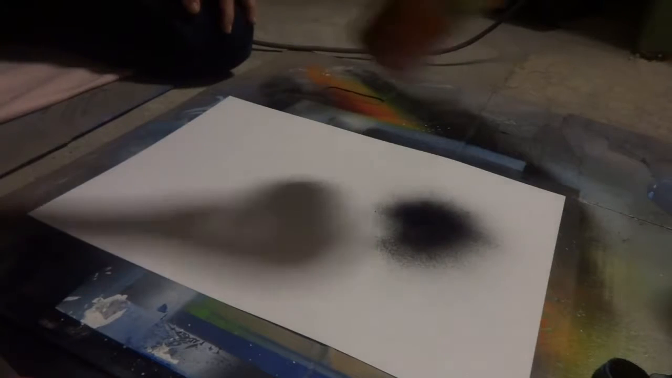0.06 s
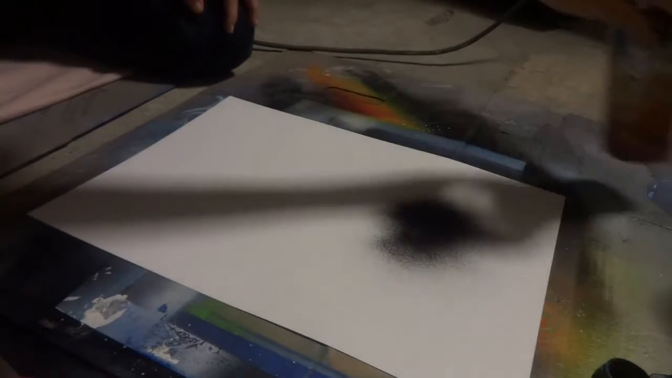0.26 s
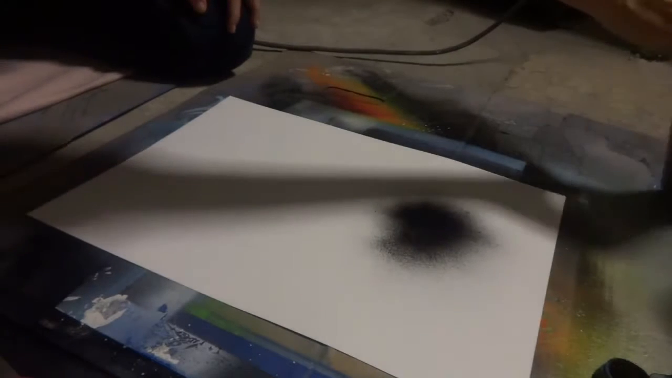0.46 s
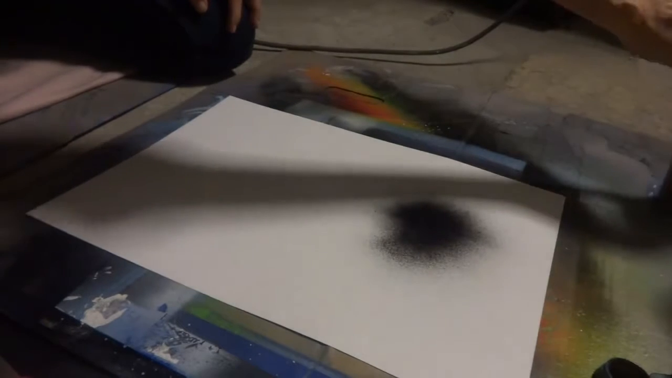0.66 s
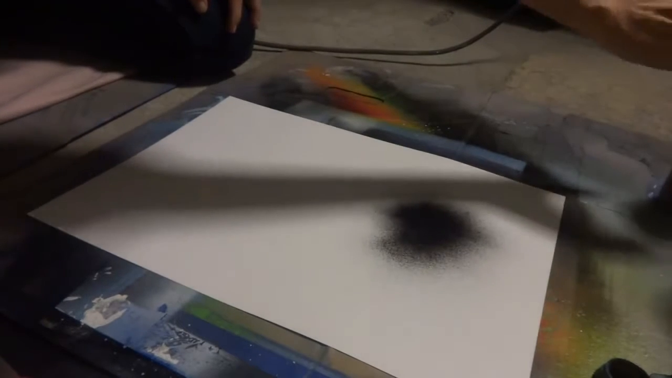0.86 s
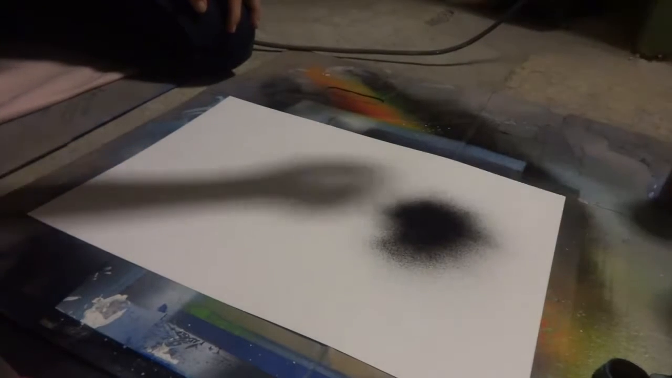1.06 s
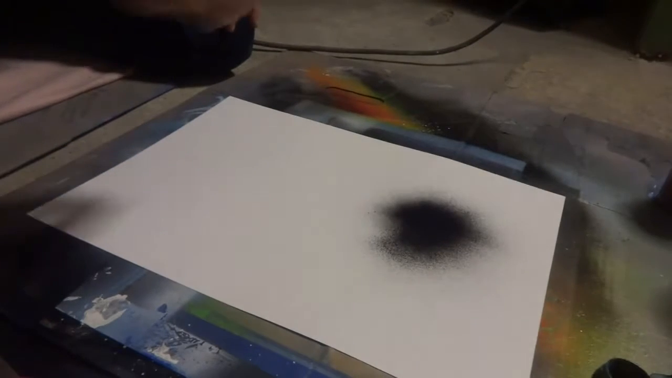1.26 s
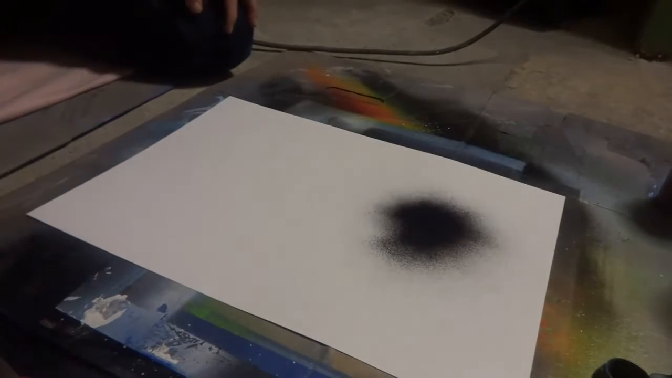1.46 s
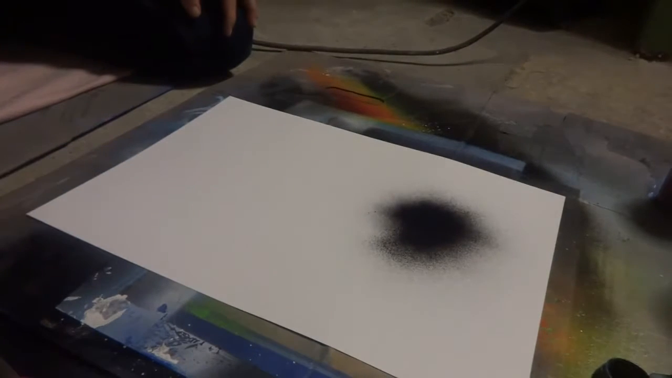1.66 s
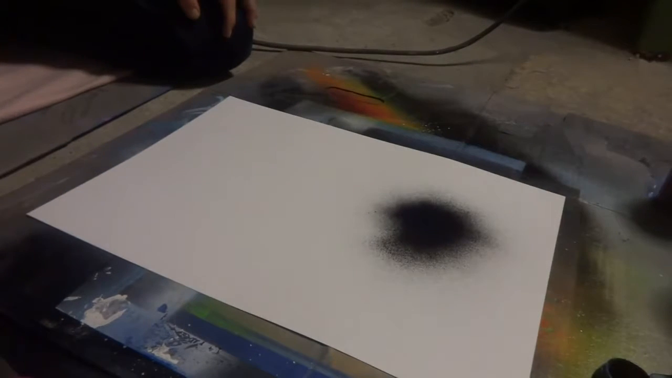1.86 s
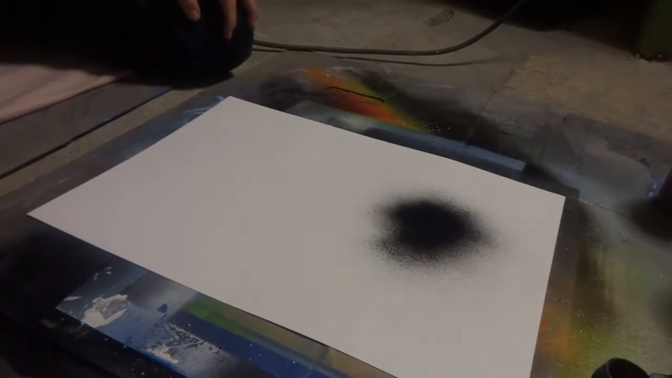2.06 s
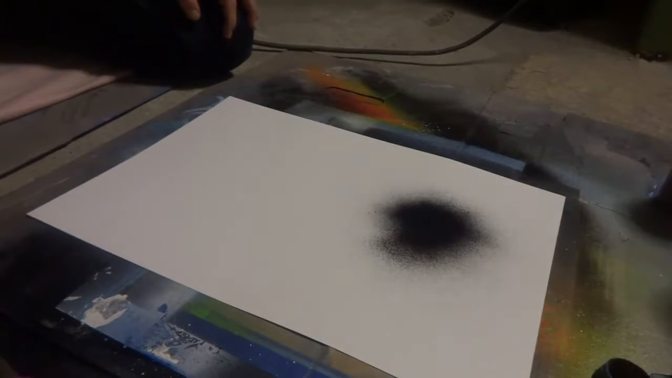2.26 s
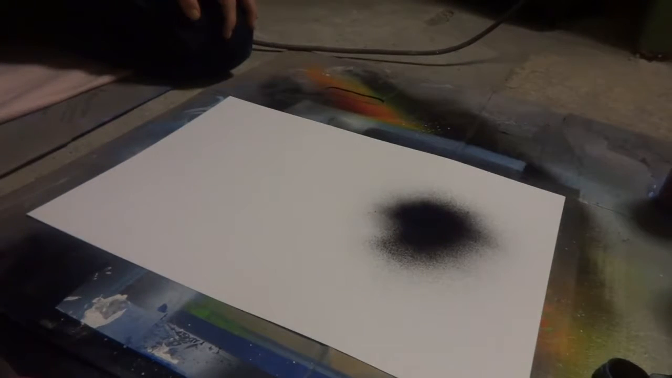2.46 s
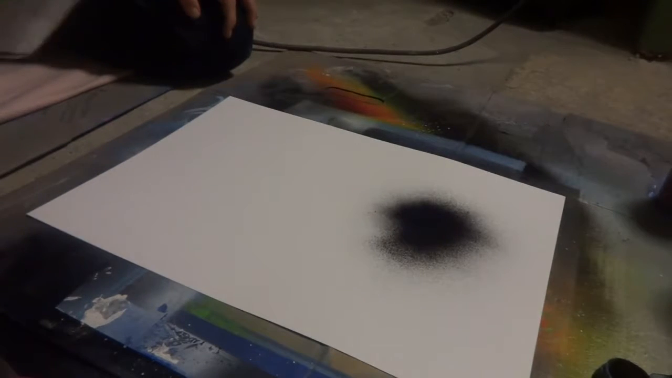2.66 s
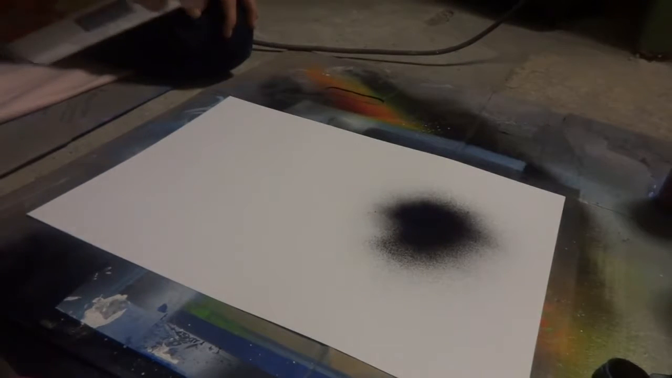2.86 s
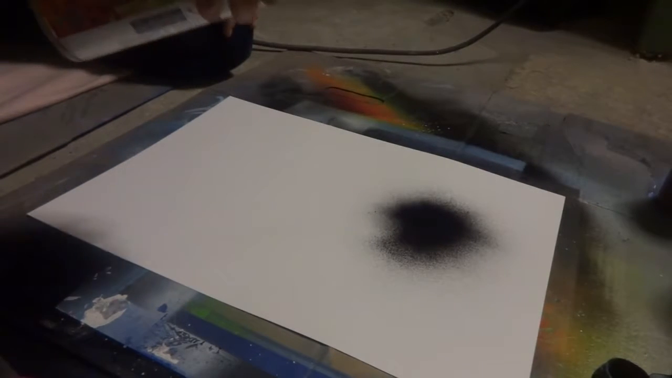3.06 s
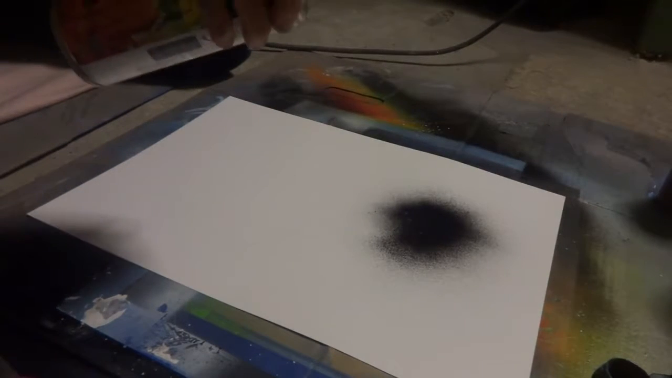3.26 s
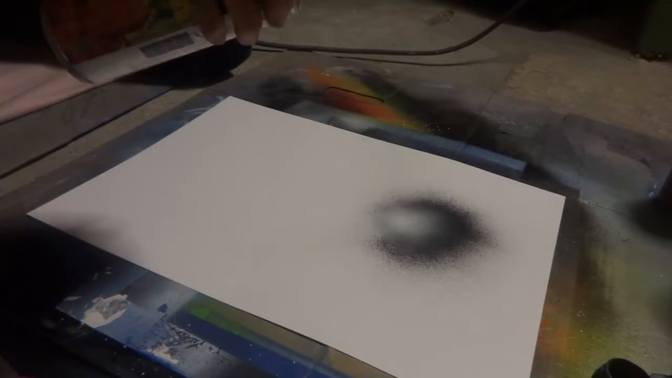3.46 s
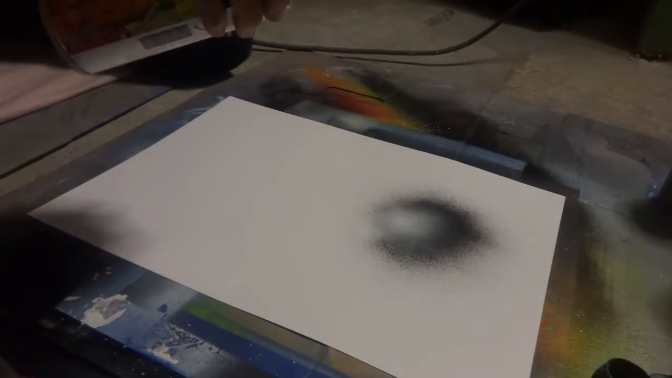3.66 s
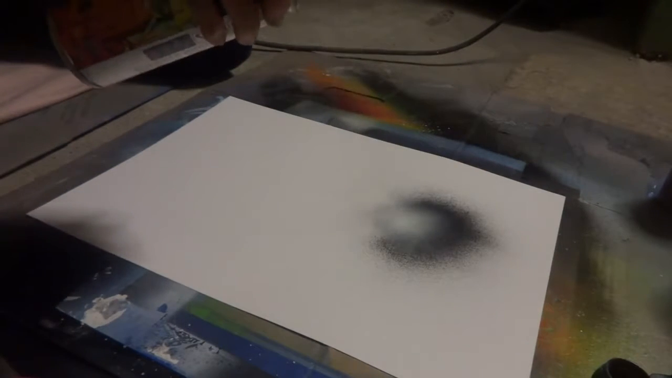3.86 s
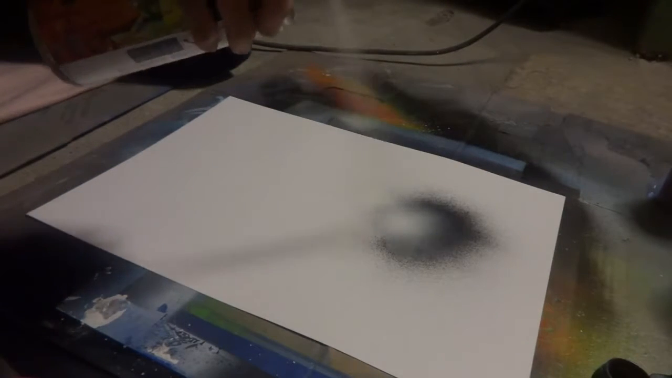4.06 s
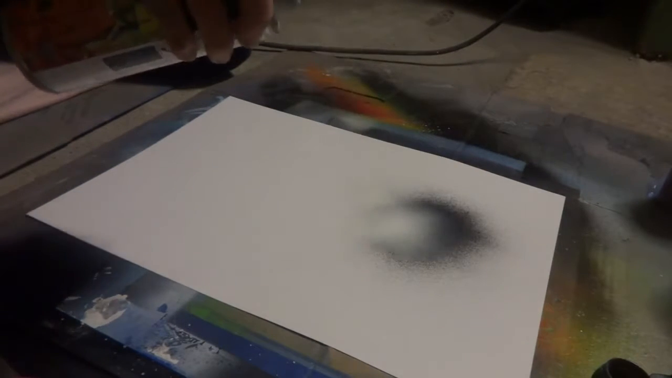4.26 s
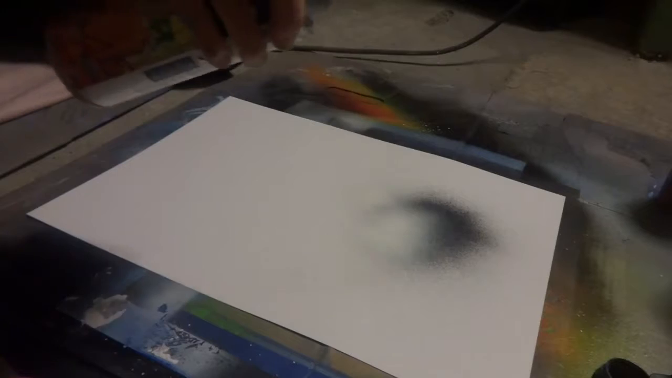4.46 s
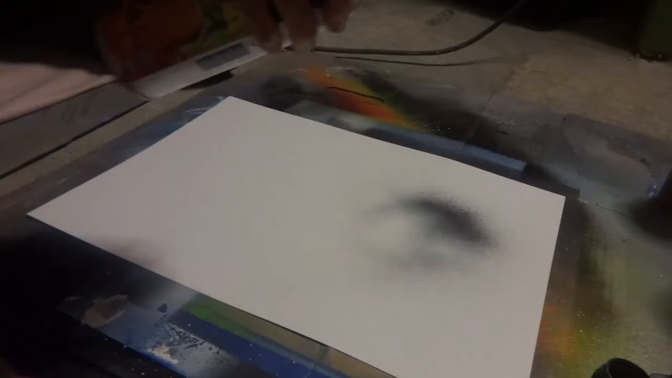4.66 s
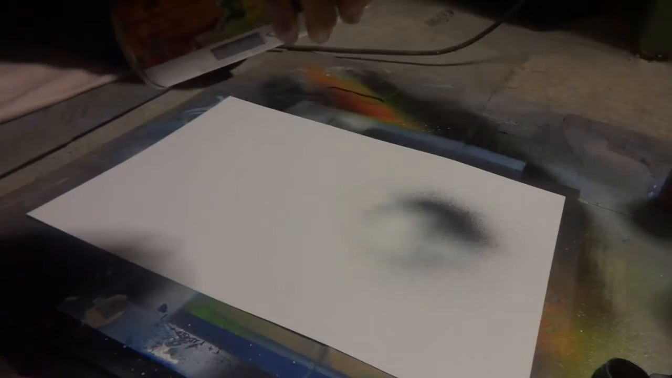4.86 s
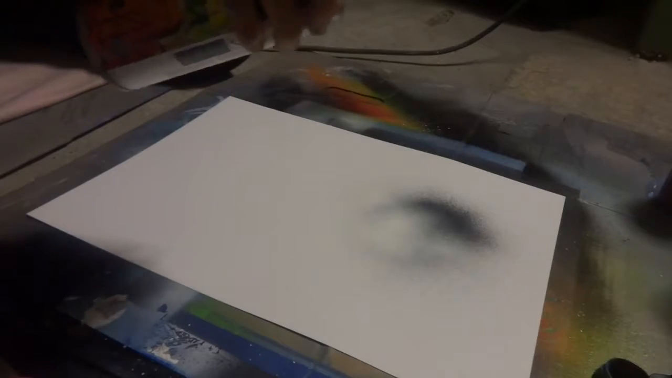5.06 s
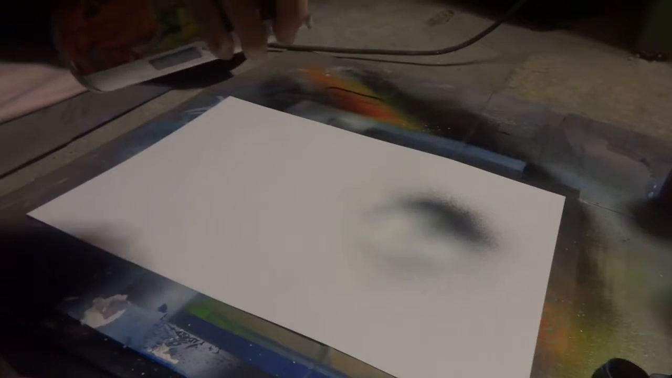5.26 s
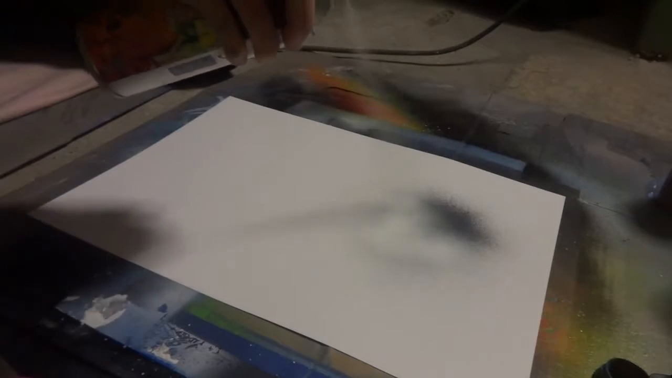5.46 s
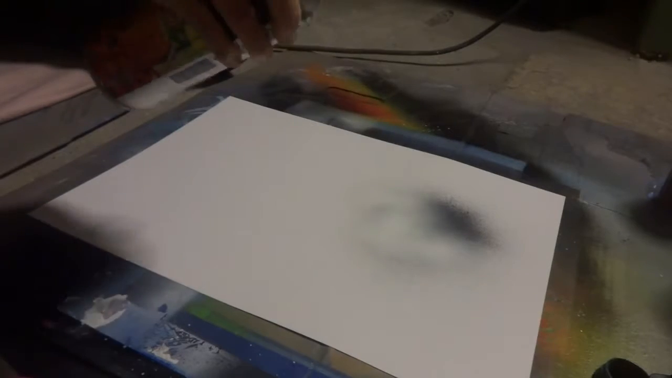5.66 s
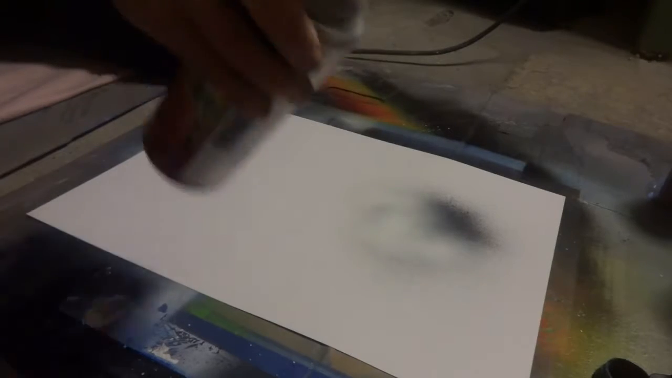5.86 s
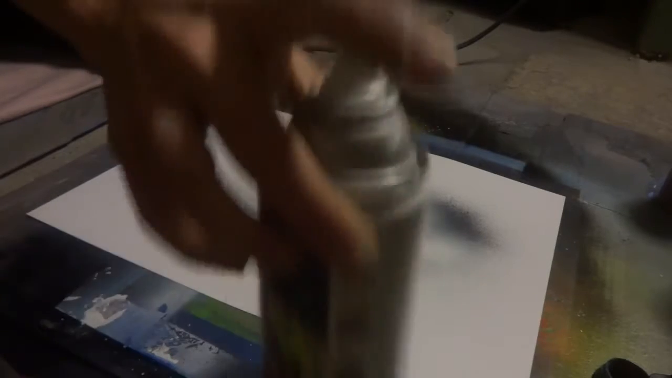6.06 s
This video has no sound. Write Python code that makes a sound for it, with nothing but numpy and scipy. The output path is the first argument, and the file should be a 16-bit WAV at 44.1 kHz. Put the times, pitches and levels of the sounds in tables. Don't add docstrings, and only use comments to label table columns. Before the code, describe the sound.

Close stereo pickup in a small hard room with low machine hum. Sleeve and paper rustle, knocks, and a light hollow can bouncing several times on the floor. A faint dragging squeak leads to a hard clack as something is knocked; a damped ball rattle follows from a full can. Then separate spray bursts of gas and paint rush onto paper, the first weak, the later ones fuller, before light handling and small ticks.

```python
import sys
import numpy as np
from scipy import signal
from scipy.fft import rfft, irfft
from scipy.io import wavfile
from scipy.ndimage import uniform_filter1d

SR = 44100
rng = np.random.default_rng(int(sys.argv[2]) if len(sys.argv) > 2 else 0)


def unload_wav(signal):
    wavfile.write(
        sys.argv[1],
        SR,
        np.round(np.clip(np.atleast_2d(signal).T, -1, 1) * 32767).astype(np.int16),
    )


def gain_from_decibels(decibels):
    exponent = np.asarray(decibels, float) / 20
    return 10 ** exponent


N = 269892

# t/s, pan/dB
REACH = [(.5, 2), (.62, -5), (.85, -14), (1.9, 3), (3.0, 5), (5.9, -3)]


def sprays():
    # f/Hz, level/dB
    jet_colour = [(2700, -55), (3100, -26), (3700, -9), (4350, -8.5), (5000, -5.5), (5700, -5.5), (6400, 1),
                  (7100, -5.5), (7850, 1), (8900, -3.5), (10100, 3), (12300, 0.5), (13600, 2), (16000, 0.5)]
    # f/Hz, level/dB
    roar_colour = [(500, -23), (900, -12.5), (1400, -11.5), (1800, -8.5), (2150, -4), (2420, -1),
                   (2800, -1.5), (3400, -5), (4300, -12)]
    # t/s, delay of the paper's echo/ms
    heights = [(3.0, .79), (3.3, .75), (3.68, .71), (4.0, .77), (4.3, .77), (4.54, .81), (5.0, .81),
               (5.38, .69)]
    # delay/ms, share
    near_echoes = [(0.389, .2), (1.3, 0.076), (1.801, -0.18), (2.3, -0.037), (3.098, 0.16)]
    aim_db = [0.5, 1.5, 1, 0.5, 1, 0, 1, 2]

    opened = np.repeat(gain_from_decibels(presses()).sum(axis=0), 32)[:N]
    jet = abs(uniform_filter1d(opened, size=130))
    roar = gain_from_decibels(-27) * jet ** 0.66 * jet / (jet + gain_from_decibels(-58.5))

    gas = grainy(spread_db=2.0, size=24)
    at = np.arange(N)
    starts, paper_ms = np.transpose(heights)
    press = np.maximum(np.searchsorted(starts, at / SR) - 1, 0)
    lag = paper_ms[press] * SR / 1000
    heard = gas + 0.22 * np.interp(at - lag, at, gas)
    for ms, share in near_echoes:
        heard = heard + share * np.interp(at - lag * ms / paper_ms.mean(), at, gas)

    hiss = coloured(heard, jet_colour)
    treble = band(hiss, 6000, 20000)
    treble_share = np.minimum(jet / gain_from_decibels(-29.5), 1) ** 0.93
    hiss = hiss - (1 - treble_share) * treble
    return jet * hiss + gain_from_decibels(np.take(aim_db, press)) * roar * coloured(heard, roar_colour)


def presses():
    # start t/s, length/s, open level/dB, change over the hold/dB, relative opening time
    nozzle_presses = [
        (3.079, 0.1, -50, 3.5, 1.01),
        (3.088, 0.071, -43.5, 5.5, 1.1),
        (3.352, 0.02, -34, 2.5, 0.7),
        (3.375, 0.1, -26, 2.5, 0.97),
        (3.72, 0.12, -25.5, 0.5, 1.25),
        (4.052, 0.14, -25, -2, 0.94),
        (4.321, 0.12, -23, -1.5, 1.25),
        (4.571, 0.094, -22.5, -3, 1.05),
        (5.126, .11, -28.5, 5, 0.88),
        (5.417, 0.1, -24, 0.5, 1.01),
    ]
    # t/s after the start, level/dB
    valve = [(0, -48.5), (.006, -16), (.017, 0)]

    start, length, db, change_db, slowness = np.transpose(nozzle_presses)[:, :, None]
    t = np.arange(0, N + 32, 32) / SR - start
    u = np.clip(t / length, 0, 1)
    opening = np.interp(t / slowness, *np.transpose(valve), -200)
    arch = 1.04 * np.sin(np.pi * u)
    close_db_per_s, knee_s = 525.5, 0.006
    closing = close_db_per_s * knee_s * np.logaddexp(0, (t - length) / knee_s)
    return db + opening + change_db * u + arch - closing


def shading(jet):
    return gain_from_decibels(-19.0) * band(band(jet, 3600, 13000), 3200, 14500) * [[-1], [1]]


def nozzle_click():
    # t/s, peak level/dB, relative treble/dB, pan/dB, lasting ring/dB
    click = [
        (2.9589, -33, 6, 0.0064, -7),
    ]
    # f/Hz, clack level/dB, ring level/dB, time to fall 60 dB/s
    nozzle = [(2156, -5, -1, 0.068), (2514, -4, -3.5, 0.11), (3060, -8.5, -5, 0.074), (3320, -12, 0, 0.17),
              (3600, -9.5, -12, 0.073), (4170, -7, -14, .1), (4424, 5, 5.5, 0.15), (4650, 10, -3.5, 0.2),
              (4750, 0, -6, .18), (5220, -5, -16, .1), (6900, -10.5, -16, .1), (7300, -6, -16, .12),
              (7750, 2, 1.5, 0.2), (8150, -10, -20, .1)]
    return struck(click, nozzle, split_hz=4000, low_hz=1900, quick_s=0.022, waver=0.7,
                  contact_s=0.0006, scatter=0.3)


def can_bounces():
    # t/s, peak level/dB, relative treble/dB, pan/dB, lasting ring/dB
    bounces = [
        (0.751, -36, 0.5, -7.5, -14),
        (0.791, -54, 0, -6, -24),
        (0.806, -36, -6, -7, -14.5),
        (0.889, -49, -6, -8, -16),
        (0.939, -32, -0.5, -6.5, -11.5),
        (1.023, -34, -6.5, -6.5, -12.5),
        (1.104, -40.5, -10, -10.5, -6.5),
        (1.124, -39.5, -24, -3, -32),
        (2.456, -52, -9, 1, 0),
    ]
    # f/Hz, clack level/dB, ring level/dB, time to fall 60 dB/s
    empty_can = [(485, -23, -2, 0.072), (607, 6, -21, 0.024), (920, -30, -4.5, 0.72),
                 (1320, -10, -13, 0.084), (1640, -9.5, -13, 0.049), (1933, -10.5, -9.5, 0.3),
                 (2714, -1, -1, 0.24), (3100, -4, -30, 0.041), (4380, 4, -17, .12), (4300, -9, 4, 0.061),
                 (4540, -2, 7, 0.065), (5170, -3, -18, .1), (5610, -2, -6, 0.13), (5970, -5, -26, .08)]
    return struck(bounces, empty_can, split_hz=2300, low_hz=350, quick_s=0.017, waver=0.14,
                  contact_s=0.0012, scatter=0.87)


def ball_rattles():
    # t/s, peak level/dB, relative treble/dB, pan/dB, lasting ring/dB
    rattles = [(2.2568, -50, -2, 9, -3), (2.4528, -50, 5.5, 11, 2), (2.4704, -49.5, 6, 7, -16),
               (2.62, -51, 1, 8, -16), (2.6436, -39.5, 6, 3.5, -22), (2.698, -44.5, 3.5, 4, -3),
               (2.817, -49.5, 7.5, 2, -22), (2.8219, -46.5, 3, -6, -5), (5.6815, -52, -8, -8, -24),
               (5.7134, -56, -17, -8, -15), (5.7923, -48, -8, -3, -19)]
    # f/Hz, clack level/dB, ring level/dB, time to fall 60 dB/s
    full_can = [(2270, -11, -13, 0.21), (2460, -27, 2, 0.19), (2725, -3, -6, .1), (3125, -16, 4.5, 0.14),
                (3380, -2, -13, .12), (3600, -10, -20, .1), (4450, 4.5, -16, 0.037), (4480, 0, -11, .1),
                (4870, -8, -11, .1), (6120, -6, -20, 0.013), (6600, -13, -22, .06), (7800, -5.5, -14, .05)]
    return struck(rattles, full_can, split_hz=4000, low_hz=1800, quick_s=0.024, waver=0.85,
                  contact_s=0.0007, scatter=0.6)


def struck(events, modes, split_hz, low_hz, quick_s, waver, contact_s, scatter):
    stops = [.934, 1.019, 1.1, 1.23, 2.5, 3.1, 7.0]
    out = np.zeros((2, N))
    t = np.arange(SR // 2) / SR
    hz, clack_db, lasting_db, t60 = np.transpose(modes)[:, :, None]
    is_low = hz[:, 0] < split_hz
    contact = 1 - np.exp(-t / contact_s)
    turn = 2 * np.pi * hz * t
    chance = rng.standard_normal((len(events), len(modes), 3 + len(t) // 90))
    for (s, peak_db, treble_db, pan_db, ring_db), luck in zip(events, chance):
        place, detune, phase = luck[:, :3].T[:, :, None]
        tremble = uniform_filter1d(np.repeat(luck[:, 3:], 90, axis=1), size=90, axis=1)
        held_db = 60 * np.maximum(t + s - stops[np.searchsorted(stops, s)], 0) / 0.097
        clack = gain_from_decibels(clack_db - 60 * t / quick_s) * np.sin(turn * (1 + 0.015 * detune) + scatter * phase)
        lasting = gain_from_decibels(lasting_db + ring_db - 60 * t / t60 - held_db) * np.sin(turn)
        lasting = lasting * (1 - waver + waver * tremble)
        rings = band(gain_from_decibels(1.5 * place) * contact * (clack + lasting), low_hz, 15000)
        low, high = rings[is_low].sum(axis=0), rings[~is_low].sum(axis=0)
        blow = low / abs(low).max() + gain_from_decibels(treble_db) * high / abs(high).max()
        add(out, s, gain_from_decibels(peak_db) * blow, pan_db)
    return out


def ball_ticks():
    # t/s, peak level/dB, f/Hz
    small_bounces = [(2.2162, -58, 2280), (2.2253, -52, 2200), (2.3675, -55, 2500), (2.3916, -51, 2420),
                     (2.4103, -46, 2430), (2.4239, -47, 2325), (2.4531, -34.5, 4730), (2.4575, -57, 3230),
                     (2.5427, -51, 3500), (2.5663, -59, 2890), (2.6025, -63, 2240), (2.6481, -44, 4150),
                     (2.6541, -50, 4390), (2.6635, -49, 3190), (2.6853, -46, 2580), (2.6932, -40, 4435),
                     (2.6983, -43, 3330), (2.7052, -45, 3060), (2.7097, -45, 3060), (2.7146, -45, 4390),
                     (2.7264, -45, 3190), (2.7315, -43, 4800), (2.7433, -42, 3150), (2.7535, -50, 4390),
                     (2.7693, -52, 4520), (2.7754, -48, 3230), (2.7809, -48, 4435), (2.7945, -44, 4800),
                     (2.826, -50, 4610), (2.8656, -55, 2370), (2.8218, -49, 4630), (2.9595, -34, 7750),
                     (5.6827, -49, 2590), (5.7807, -61, 2380), (5.7961, -45, 2660), (5.81, -61, 2310),
                     (5.8155, -54, 2360), (5.8309, -55, 4780), (5.9017, -53, 5000), (5.9383, -49, 8250),
                     (5.9514, -54, 4650), (5.9864, -47, 4730), (5.9936, -57, 4610)]
    return ticks(small_bounces, cycles=35.0, snap_db=-5.5, snap_s=0.016)


def clatter():
    # t/s, peak level/dB, f/Hz
    edge_hits = [(.6198, -33.5, 1270), (.6274, -43, 2150), (.633, -44, 2300), (.649, -44, 2200),
                 (.664, -49, 2500), (.673, -51, 2000), (.46, -52, 2400), (.468, -56, 1500),
                 (.48, -55, 2280), (.639, -42, 1900), (.6427, -44, 1510), (.6557, -44, 1940),
                 (.6877, -54, 2110), (1.9448, -33, 1130), (1.9536, -30, 3400), (1.9654, -41, 1600),
                 (1.967, -39, 674), (1.9774, -20.5, 1640), (1.9836, -30, 3010), (1.9885, -27, 2670),
                 (1.994, -43, 2450), (1.998, -36.5, 760), (2.001, -52, 1460), (2.0097, -38, 2110),
                 (2.0204, -33, 1980), (2.0244, -33, 2240), (2.039, -39, 3830), (2.0556, -40, 3320),
                 (2.0601, -44, 3570)]
    return ticks(edge_hits, cycles=8.2, snap_db=-10.5, snap_s=0.0087)


def ticks(rows, cycles, snap_db, snap_s):
    out = np.zeros((2, N))
    t = np.arange(SR // 20) / SR
    for (s, db, hz), noise in zip(rows, rng.standard_normal((len(rows), len(t)))):
        tone = gain_from_decibels(-60 * t * hz / cycles) * (1 - np.exp(-2 * t * hz)) * np.sin(2 * np.pi * hz * t)
        snap = band(gain_from_decibels(-60 * t / snap_s) * noise, hz, 11500)
        tick = tone / abs(tone).max() + gain_from_decibels(snap_db) * snap / abs(snap).max()
        add(out, s, gain_from_decibels(db) * tick, np.interp(s, *np.transpose(REACH)))
    return out


def rolling():
    # peak t/s, rise/s, fall/s, low mode level/dB, relative upper modes/dB
    rolls = [(2.22, 0.046, 0.83, -65, 1), (2.392, 0.018, 0.097, -59.5, -3), (2.456, 0.0065, 0.015, -47, -4),
             (2.56, 0.068, 0.03, -84, -13.5), (2.645, 0.075, 0.061, -57, 5.5), (2.7, 0.0088, 0.11, -62, 15),
             (2.819, 0.0055, 0.019, -60, 11), (2.83, .5, 0.05, -58, -20), (5.7, .02, 0.21, -66, -1),
             (5.796, 0.026, 0.027, -51, -15), (5.825, .03, 0.052, -72, 8), (6.0, 0.19, 0.044, -69, -3)]
    # t/s, low f/Hz, middle f/Hz, high f/Hz
    grip = [(2.18, 2460, 3850, 5000), (2.45, 2260, 3300, 4600), (2.56, 2140, 3600, 4870),
            (2.62, 2600, 3000, 4280), (2.72, 2140, 3300, 4390), (2.95, 2120, 3180, 4750),
            (5.64, 2430, 3900, 4780), (6.12, 2360, 3300, 4800)]

    bumps = grainy(spread_db=2.4, size=90)
    t = np.arange(N) / SR
    s, *modes = np.transpose(grip)
    wall = np.zeros(N)
    for k, (hz, width_hz) in enumerate(zip(modes, (65, 140, 200))):
        turn = np.exp(2j * np.pi * np.cumsum(np.interp(t, s, hz)) / SR)
        r = np.exp(-np.pi * width_hz / SR)
        mode = (turn * signal.lfilter([1 - r], [1, -r], bumps / turn)).real
        wall = wall + strokes(rolls, tilt=min(k, 1)) * evened(mode)
    return wall * gain_from_decibels(np.array([[-1.5], [-4.5]]))


def knocks():
    # t/s, peak level/dB,
    # relative body/dB, crack/dB and snap/dB
    put_down = [(0.009, -43, -2.5, -3.5, -2.5), (0.421, -47.5, -20, -12, -18), (0.449, -41, -32, -30, -21),
                (0.498, -54, 0.5, 2.5, 3), (0.553, -64, -10, 8, 7), (0.616, -34, -36, -28, -22),
                (0.622, -44, 8.5, -19, -15), (0.638, -41.5, -19, -8, -8), (0.657, -44, -18, -1, -3),
                (0.71, -51, -17, -9, 1), (0.841, -45.5, -9, 0, -2), (1.934, -43, -8, -4, -19),
                (1.943, -26.5, -38, -5, -11), (1.944, -38.5, 2.5, -17, 3), (1.977, -28.5, -20, 5, -0.5),
                (2.0205, -31, -9, -3, -1), (2.959, -51, -18, 12, 10), (5.9, -64, -4, 9, 13),
                (5.985, -66, -11, 8, -5)]
    # low f/Hz, high f/Hz, time to fall 60 dB/s
    knock_bands = [(313, 790, 0.2), (660, 2210, 0.13), (1980, 3980, 0.27), (5000, 7800, 0.017)]
    # t/s, level/dB, f/Hz, time to fall 60 dB/s
    thumps = [(.452, -35.5, 107, 0.073), (0.454, -36, 373, 0.027), (.449, -32, 1320, 0.011),
              (.617, -34.5, 1250, 0.046), (0.617, -31, 510, 0.028), (.63, -44, 135, 0.1),
              (1.9455, -19, 860, 0.0064), (1.9785, -23, 774, 0.019), (2.0215, -33.5, 890, 0.02)]

    out = np.zeros((2, N))
    t = np.arange(SR // 4) / SR
    blow = gain_from_decibels(-60 * t / 0.014)
    chance = rng.standard_normal((len(put_down), len(t)))
    for (s, peak_db, body_db, crack_db, snap_db), noise in zip(put_down, chance):
        pan_db = np.interp(s, *np.transpose(REACH))
        for db, (lo_hz, hi_hz, t60) in zip((body_db, 0, crack_db, snap_db), knock_bands):
            part = band(noise * (blow + 0.24 * gain_from_decibels(-60 * t / t60)), lo_hz, hi_hz)
            add(out, s, gain_from_decibels(peak_db + db) * part / abs(part).max(), pan_db)
    for s, db, hz, t60 in thumps:
        thump = gain_from_decibels(db - 60 * t / t60) * (1 - np.exp(-t * hz)) * np.sin(2 * np.pi * hz * t)
        add(out, s, thump, 0)
    return out


def rustle():
    # peak t/s, rise/s, fall/s, fine level/dB, relative coarse level/dB
    sleeve = [(.01, 0.056, 0.13, -60.5, 16), (.106, 0.018, 0.23, -58, -23), (.17, 0.012, 0.021, -51.5, -25),
              (.216, 0.055, 0.28, -66, -14), (5.6, .02, 0.19, -64, 12), (5.79, .6, 0.19, -67, 4),
              (5.996, 0.25, 0.017, -59.5, -19), (6.12, 0.12, .1, -66, 16)]
    paper = [(.444, 0.04, 0.26, -73, 21.5), (0.617, 0.011, 0.25, -60.5, 15), (.76, 0.045, 0.92, -65.5, 19),
             (0.942, 0.0033, 0.022, -57, 14), (.97, 0.035, 0.21, -82, 23), (1.925, 0.17, 0.014, -84, 30),
             (1.952, .006, 0.078, -49, 21), (2.03, 0.068, 0.062, -46.5, -3), (2.1, .05, 0.57, -74.5, 18),
             (2.264, 0.057, 0.21, -63, 6), (2.462, 0.13, 0.33, -61.5, 10.5), (2.65, 0.081, 0.013, -57, -3),
             (2.72, 0.051, 0.32, -74.5, 23), (2.85, .2, 0.074, -72, 8)]

    crackle = grainy(spread_db=2, size=90)
    bright = evened(band(crackle, 2500, 13300))
    dull = evened(band(band(crackle, 2700, 8800), 2900, 12300))
    coarse = evened(band(crackle, 490, 4140))
    fine = strokes(sleeve) * bright + strokes(paper) * dull
    return gain_from_decibels(-4.0) * fine + gain_from_decibels(-14.0) * strokes(sleeve + paper, tilt=1) * coarse


def squeak():
    drags = [
        (1.72, 0.1, 0.18, -70.5, -17),
        (1.93, 0.28, .03, -67, -22),
    ]
    # f/Hz, width/Hz
    squeak_tones = [(1280, 120), (5950, 150)]
    rub = rng.standard_normal(N)
    out = np.zeros(N)
    for k, (hz, width) in enumerate(squeak_tones):
        tone = resonate(resonate(rub, hz, width), hz, width)
        out = out + strokes(drags, tilt=k) * evened(tone)
    return out


def room(x):
    # f/Hz, time to fall 60 dB/s
    ring_times = [(200, 0.39), (1000, 0.35), (3000, 0.33), (8000, 0.27), (16000, 0.16)]
    # f/Hz, level/dB
    apart = [(100, -14.5), (500, -7), (1500, -4), (3200, -24.5), (5000, -9), (8000, -12.5), (11000, -17),
             (14000, -19)]

    taps = np.zeros((2, SR // 2))
    starts = np.arange(200, SR // 2 - 20, 20)
    places = starts + rng.integers(0, 20, (2, len(starts)))
    signs = rng.choice([-1., 1.], (2, len(starts)))
    np.put_along_axis(taps, places, signs, axis=1)
    hz, t, z = signal.stft(taps, SR, nperseg=256)
    colour = gain_from_decibels(np.array([0 * hz, read(apart, hz) + 2.8]))[:, :, None]
    decay = gain_from_decibels(-60 * t / read(ring_times, hz)[:, None])
    mid, side = signal.istft(z * colour * decay, SR, nperseg=256)[1]
    tail = np.array([mid + side, mid - side]) / np.linalg.norm(mid)
    return signal.fftconvolve(x[None], tail, axes=1)[:, :N]


def hum():
    # f/Hz, level/dB
    hum_colour = [(20, -30.5), (60, -43), (80, -35), (250, -14), (450, -9), (600, -7.5), (800, -15),
                  (1200, -15.5), (2300, -20), (5000, -25.5), (10000, -31), (15000, -32.5), (16000, -46)]
    # f/Hz, width/Hz, level/dB
    hum_tones = [(107, 22.5, 4.5), (171.2, 51, -4.5), (213.4, 94, -1.5), (291.2, 64, -2.5),
                 (367.5, 120, -7)]
    # f/Hz, likeness
    likeness = [(30, 0.94), (100, 0.98), (250, 0.6), (600, 0.028), (2000, 0.024), (8000, 0.29),
                (10500, 0.83), (15000, 0.94)]
    # t/s, level/dB
    swell = [(0.0, 7), (.19, -4.5), (1.09, 3), (1.76, -3), (2.78, -1.5), (3.6, -1), (4.38, -6.5),
             (5.401, -1), (5.76, 0), (6.12, -2)]

    frames = N // 512 + 5
    hz = np.fft.rfftfreq(2048, 1 / SR)
    a, b, c, d, patches = rng.standard_normal((frames, len(hz), 5)).T
    patches = uniform_filter1d(uniform_filter1d(patches, size=10, axis=0), size=8, axis=1)
    patches = evened(patches)
    same = np.clip(read(likeness, hz), -1, 1)[:, None]
    left = a + 1j * b
    z = np.array([left, same * left + np.sqrt(1 - same ** 2) * (c + 1j * d)])
    shape = gain_from_decibels(read(hum_colour, hz)[:, None] + 1.8 * patches)
    bed = signal.istft(z * shape, nperseg=2048, noverlap=1536)[1][:, :N]
    flat = signal.istft(z, nperseg=2048, noverlap=1536)[1][:, :N]
    tones = [gain_from_decibels(db) * evened(resonate(resonate(flat, f, w), f, 2 * w)) for f, w, db in hum_tones]
    deep, *low = tones
    machines = gain_from_decibels(-72.5) * deep + gain_from_decibels(-61.0) * evened(sum(low))
    load = gain_from_decibels(np.interp(np.arange(N) / SR, *np.transpose(swell)))
    mains = gain_from_decibels(-81.0) * evened(resonate(flat.sum(axis=0), 49., 3.9))
    return gain_from_decibels(-62.5) * evened(bed) + load * machines + mains


def strokes(rows, tilt=0):
    s, rise, fall, db, rel = np.transpose(rows)[:, :, None]
    t = np.arange(0, N + 64, 64) / SR
    away = np.maximum((s - t) / rise, (t - s) / fall)
    gain = gain_from_decibels(db + tilt * rel - 20 * away).sum(axis=0)
    return np.interp(np.arange(N) / SR, t, gain)


def grainy(spread_db, size):
    jumps = np.repeat(np.minimum(rng.exponential(1, N // size + 1), 5), size)[:N]
    return evened(rng.standard_normal(N) * gain_from_decibels(spread_db * uniform_filter1d(jumps, size)))


def evened(x):
    return x / np.sqrt(np.mean(x ** 2) + 1e-20)


def read(points, hz):
    f, value = np.transpose(points)
    return np.interp(np.log(hz + 1), np.log(f + 1), value)


def coloured(x, spectrum):
    hz = np.fft.rfftfreq(len(x), 1 / SR)
    inside = (hz > spectrum[0][0]) & (hz < spectrum[-1][0])
    return evened(irfft(rfft(x) * gain_from_decibels(read(spectrum, hz)) * inside, len(x)))


def band(x, lo_hz, hi_hz):
    sos = signal.butter(2, [lo_hz, min(hi_hz, SR / 2.1)], "bandpass", fs=SR, output="sos")
    return signal.sosfilt(sos, x)


def resonate(x, hz, width):
    return signal.lfilter(*signal.iirpeak(hz, hz / width, SR), x)


def add(mix, s, sound, pan_db):
    part = mix[:, round(s * SR):][:, :len(sound)]
    part += sound[:part.shape[1]] * gain_from_decibels(np.array([[pan_db / 2], [-pan_db / 2]]))


def scene():
    jet = sprays()
    hits = nozzle_click() + can_bounces() + ball_rattles() + ball_ticks() + clatter() + knocks()
    handling = hits + rolling() + rustle() + squeak()
    echo = room(gain_from_decibels(-9.5) * handling.mean(axis=0) + gain_from_decibels(-11.0) * jet)
    return handling + jet + shading(jet) + echo + hum()


def top_cut(x):
    return signal.sosfilt(signal.butter(12, 16960, fs=SR, output="sos"), x)


def record(dry):
    lowpass = signal.firwin(511, 15740, window=("kaiser", 9), fs=SR)
    limited = signal.oaconvolve(dry, lowpass[None], "same")
    return top_cut(limited)


dry = scene()
out = record(dry)
unload_wav(out)
```